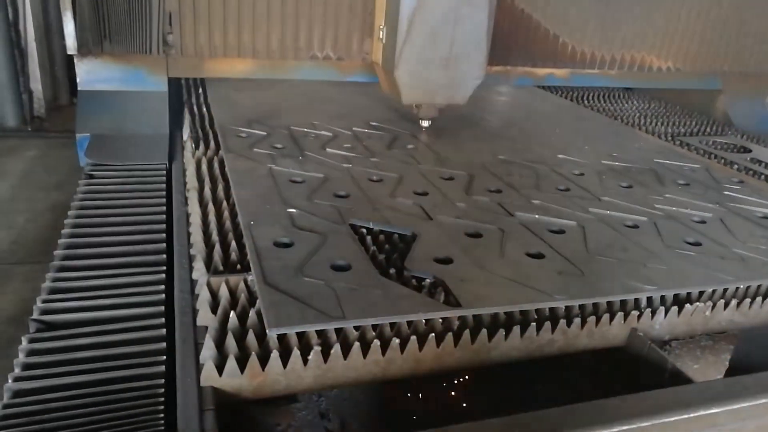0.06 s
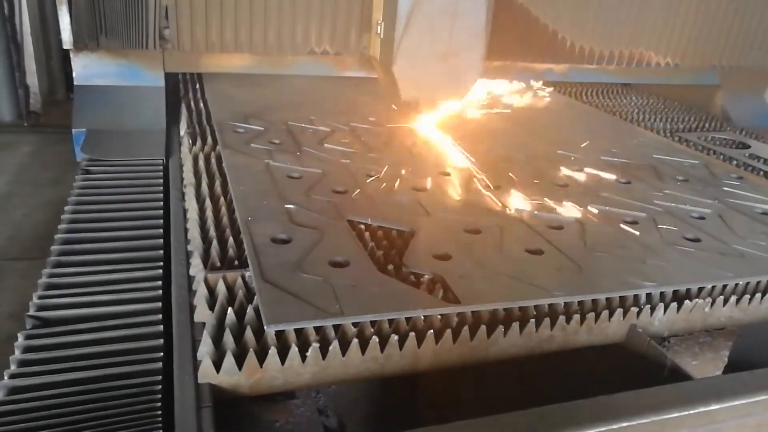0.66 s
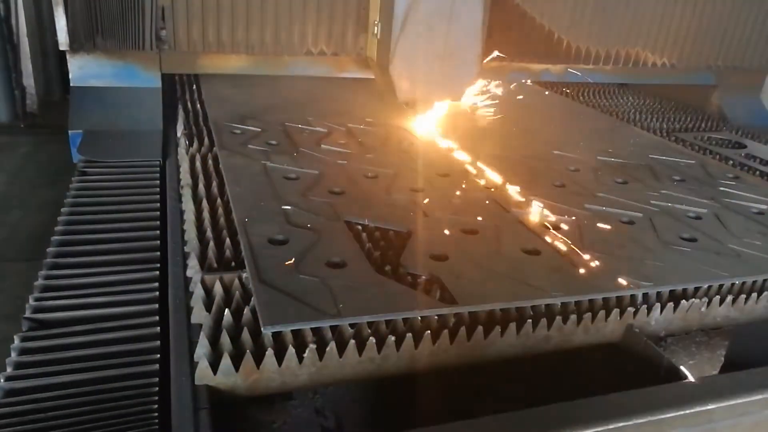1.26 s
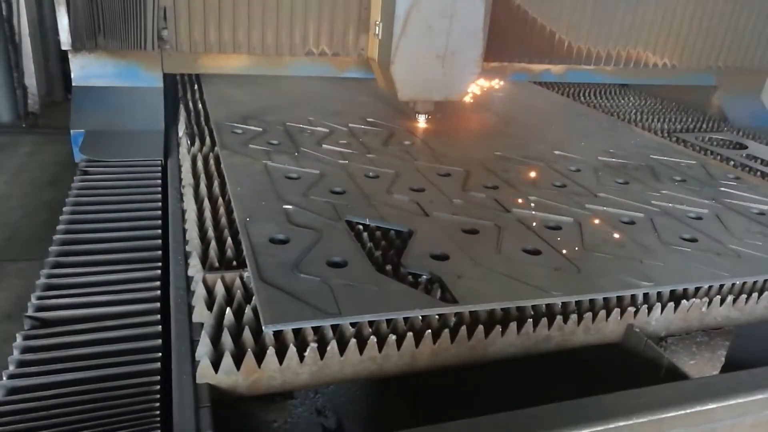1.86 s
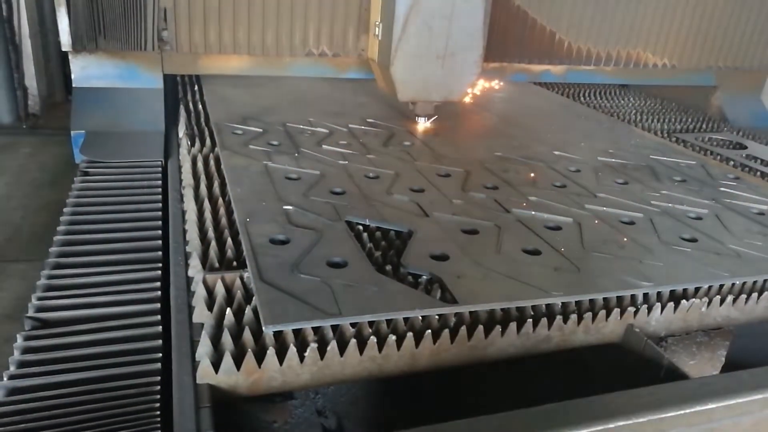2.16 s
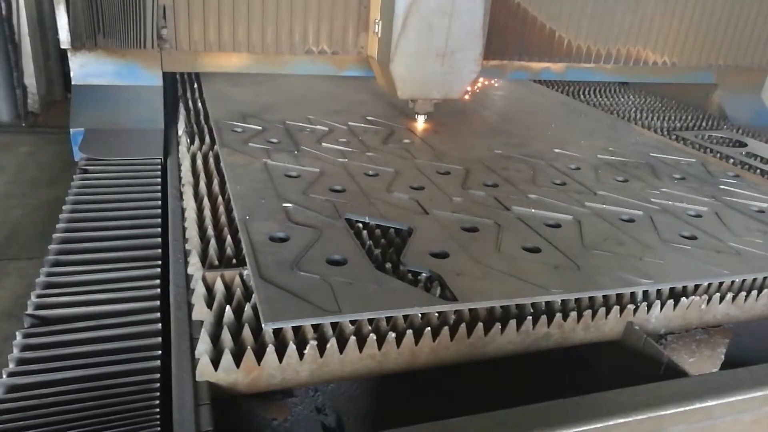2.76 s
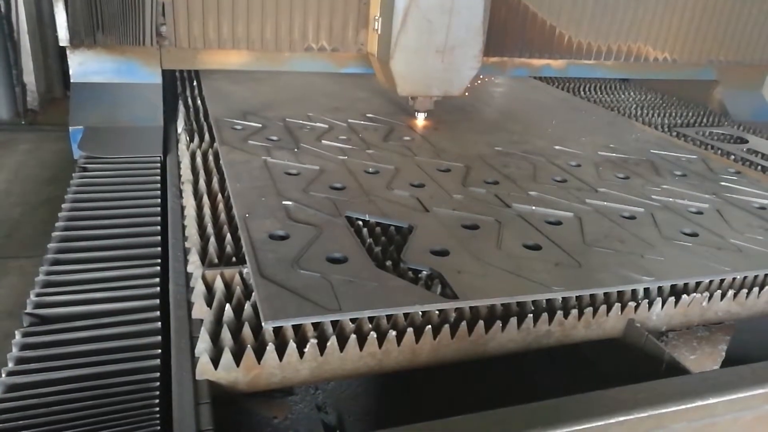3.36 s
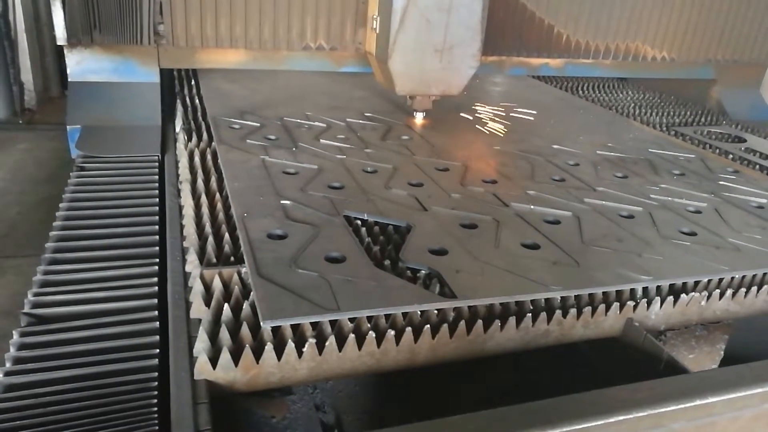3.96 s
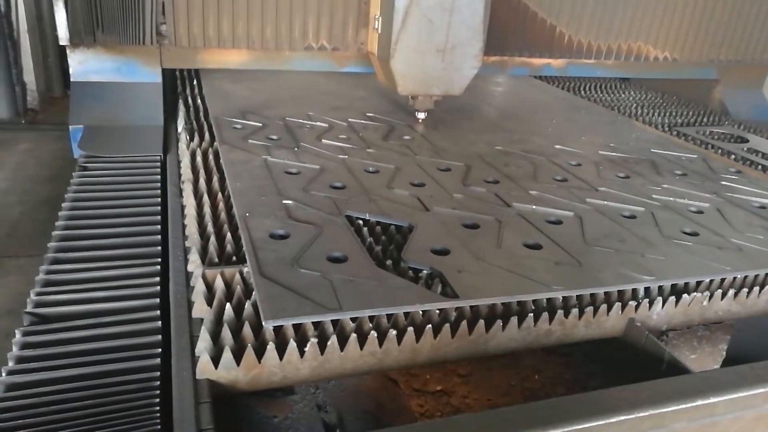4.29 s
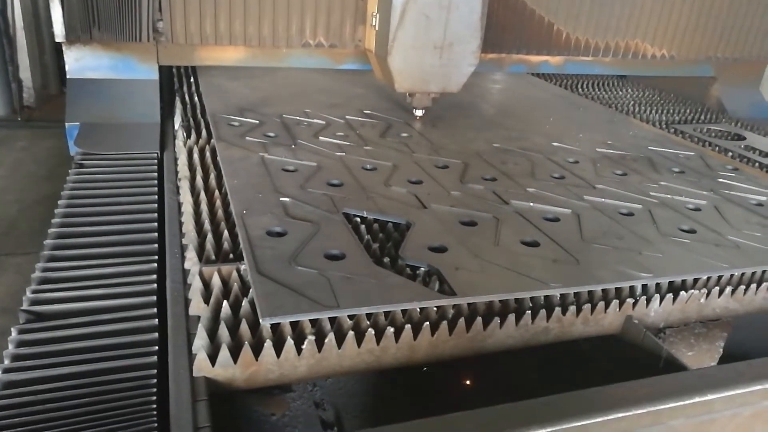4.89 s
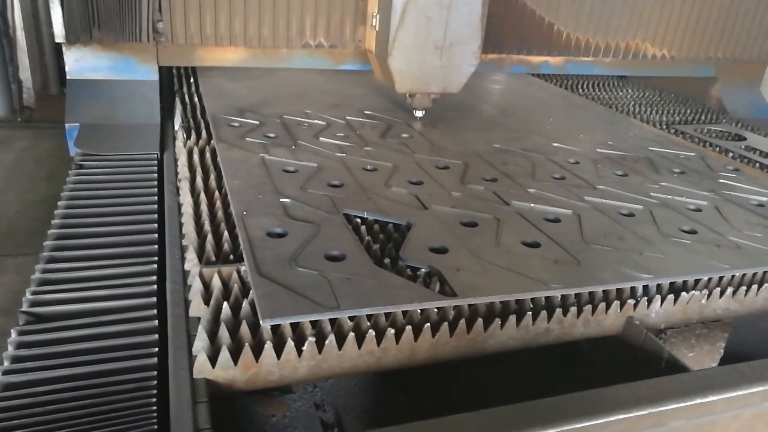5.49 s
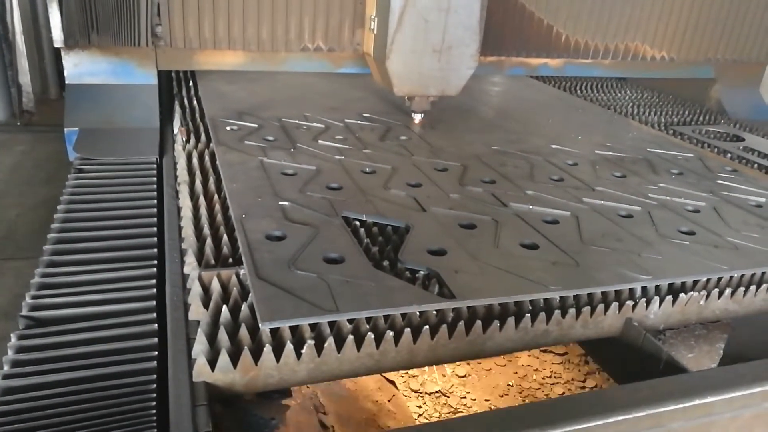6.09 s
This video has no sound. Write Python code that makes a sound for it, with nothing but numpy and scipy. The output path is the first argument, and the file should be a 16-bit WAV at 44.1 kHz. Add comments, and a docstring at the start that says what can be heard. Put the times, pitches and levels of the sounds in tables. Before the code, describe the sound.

Loud high hiss of a laser piercing steel plate turns to a crackling buzz, then falls away, with a workshop fan rumbling underneath.

```python
"""Laser piercing steel plate

Over the hum of a workshop's extractor fan, a valve spits and a gas jet builds to a loud hiss.
The laser beam then pulses 200 times a second: the hiss buzzes, the hole sings and beads of melt pop.
When the beam breaks through, the gas escapes under the plate and the jet falls to a faint hiss."""
import sys
import numpy as np
from scipy import signal
from scipy.fft import rfft, irfft, next_fast_len
from scipy.io import wavfile

SR = 44100
rng = np.random.default_rng(int(sys.argv[2]) if len(sys.argv) > 2 else 0)


def bounce(signal):
    """Save signal as a 16-bit WAV file at the path given by the first command-line argument."""
    frames = np.transpose(np.atleast_2d(signal))
    limited = np.clip(frames, -1, 1)
    pcm = np.round(limited * 32767).astype(np.int16)
    wavfile.write(sys.argv[1], SR, pcm)


N = 270489

# how loud the background rumble sounds; it sinks as the recorder turns it down: time_s, level_db
RUMBLE_LEVELS = [(0, -47), (.85, -54.5), (1.72, -55), (1.92, -56), (3.0, -61), (3.42, -65), (5.3, -62),
                 (6.13, -62)]
# tone colour of the rumble: pitch_hz, gain_db
RUMBLE_COLOUR = [(20, -17), (48, 1.5), (70, -2), (110, -0.5), (170, -0.5), (300, 1), (480, -7.5),
                 (680, -6.5), (950, -2.5), (1500, -5.5), (3000, -12), (8000, -23.5), (16000, -30)]
# tones in the extractor fan's hum: pitch_hz, level_db
FAN_TONES = [(49, -69.5), (115, -60.3), (157, -70.5), (230.5, -73), (382, -72)]

# spits of the valve: start_s, level_db, hold_s, fade_s (time to fall 60 dB)
VALVE_SPITS = [(0.088, -33.5, 0.0091, 0.027), (0.096, -42, 0.023, 0.56), (6, -53, .003, .02)]
# tone colour of a spit: pitch_hz, left_db, right_db
SPIT_COLOUR = [(700, -39, -29), (1980, 0, -9), (4800, -15, -9), (5630, -3, 2), (7700, -1.5, -5),
               (9600, -2, -17), (12200, -11, -15), (16000, -26, -10)]

# gobs of slag blown out of the hole: start_s, peak_db, length_s
SLAG_GOBS = [(2.207, -45, .006), (2.972, -45, .0035)]
# tones of the hole and the gap under the nozzle, all multiples of the pulse rate: pitch_hz, gain_db
HOLE_TONES = [(800, -15), (1200, -14), (1400, -18), (1600, 0), (1800, -8), (2000, -12), (2800, -10),
              (4000, -14), (4600, -14)]
# the largest beads of melt bursting: start_s, level_db
BIG_POPS = [(2.163, -13), (2.2095, -13), (2.2134, -12), (2.2734, -15), (2.2945, -12), (2.3095, -14),
            (2.3434, -12), (2.6895, -16), (2.7095, -15.5), (2.7744, -15), (2.8944, -14), (2.9395, -15),
            (2.9594, -9), (2.9742, -11), (2.9784, -14), (2.9836, -8), (2.9891, -12), (3.0595, -14),
            (3.0744, -11)]
# bouts in which melt boils out of the hole: start_s, end_s, pops_per_s
BOILING_BOUTS = [(2.195, 2.37, 125), (2.675, 2.87, 55), (2.87, 3.0, 110), (3.0, 3.18, 28)]

# tone colour of the rush at the nozzle: pitch_hz, left_db, right_db
RUSH_COLOUR = [(3800, -35, -35), (4900, -18.5, -20.5), (5500, -11, -13.5), (6500, -9, -13.5),
               (7400, -7.5, -12.5), (8100, -4, -19), (9000, -1.5, -16), (9700, -1, -15.5),
               (10500, -3, -13.5), (11200, -4, -14), (11700, -11, -16), (12500, -14, -17),
               (14000, -13, -20), (15000, -12.5, -20), (16000, -17, -21)]
# tone colour of the high sizzle from the hole: pitch_hz, left_db, right_db
SIZZLE_COLOUR = [(7000, -40, -40), (10300, -31, -20), (11800, -25, -17), (12600, -24, -11),
                 (13400, -19, -7.5), (13950, -17, -2), (14700, -13, 0), (15300, -12, -1), (16000, -16, -3)]
# tone colour of the lower roar on the plate: pitch_hz, left_db, right_db
ROAR_COLOUR = [(300, -30, -30), (650, -12.5, -13), (1200, -6.5, -7.5), (1900, 0, -2), (2300, -2, -2),
               (2750, 2, -1), (3200, -3, -2), (3700, -3, 0), (4300, 0, 2), (5000, -2, -3), (8000, -20, -20)]
# narrow bands where the nozzle rings: pitch_hz, width_hz, gain_db
NOZZLE_RINGS = [(8750, 260, 1.5), (9450, 260, 3), (10030, 280, 3.5), (10950, 330, 4.5), (11600, 400, -2.5),
                (11900, 250, 3), (12450, 300, -2), (13750, 330, 4)]
# the gap between nozzle and plate rings in the rush: pitch_hz, width_hz, gain_db
GAP_RING = [(9700, 1700, 2.5)]
# the space between laser head and plate rings in the roar: pitch_hz, width_hz, gain_db
HEAD_RING = [(2620, 78, 3.5)]
# how far the jet's sound lags at the left ear: pitch_hz, lag_radians
LEFT_EAR_LAG = [(20, 0), (2000, 0), (2900, 3), (3600, 5), (4000, 7.9), (4700, 9), (5400, 11.1),
                (6200, 11.4), (7200, 12.6), (7900, 12.2), (9000, 14), (10400, 15.6), (11700, 16.6),
                (12800, 18.6), (14000, 20.9), (14900, 20.5), (16000, 21.8)]
# the jet on the deepening hole, at full pressure: time_s, rush_db, sizzle_db, roar_db
PIERCING_LEVELS = [(.7, -29, -38, -44.5), (1.16, -32, -31.5, -43), (1.21, -34.5, -32, -48.5),
                   (1.68, -34.5, -28, -49), (1.96, -37.5, -30.5, -53), (2.02, -40, -36, -52),
                   (2.3, -40, -37, -47), (2.55, -40.5, -38.5, -51.5), (2.95, -39, -34, -46.5),
                   (3.35, -39, -42.5, -51), (3.7, -38, -44.5, -50.5), (4.05, -37.5, -44, -50)]
# the jet through the open hole: time_s, rush_db, sizzle_db, roar_db
OPEN_HOLE_LEVELS = [(4.2, -55, -58, -60.5), (4.43, -53, -51, -62.5), (5.11, -55.5, -59.5, -62.5),
                    (5.45, -52, -64, -61), (5.75, -55, -56.5, -66.5), (6.13, -59, -60, -66)]
# brief surges and one sag of the jet: time_s, rise_s, fall_s, rush_db, sizzle_db, roar_db
JET_SURGES = [(.21, .08, 0.083, 2, 16, 13.5), (2.2, 0.042, 0.022, 5, 2, 5.5),
              (3.85, .03, .03, -2, -6, -2.5), (5.62, .09, 0.044, 7.5, 11, 6)]
# each sound of the jet grows as a power of the gas pressure: rush_power, sizzle_power, roar_power
PRESSURE_POWERS = [4.05, 4.3, 3.5]

VALVE_OPENS_S, PRESSURE_RISE_S = .11, .19
PULSE_HZ, PULSE_PHASE = 200, .88
PULSING_STARTS_S, PULSING_WEAKENS_S = 2.125, 3.79
BREAKTHROUGH_S, ESCAPE_S = 4.07, .05
CUTOFF_HZ = 15900


def from_db(db):
    """Turns decibels into a factor to multiply by."""
    return 10 ** (np.asarray(db) / 20)


def rms_one(x):
    """Scales a sound so that the average of its channels has a strength (rms) of 1."""
    return x / np.sqrt(np.mean(np.atleast_2d(x).mean(axis=0) ** 2) + 1e-20)


def seconds():
    """The time of every sample."""
    return np.arange(N) / SR


def in_time(rows):
    """One curve per level column, joining the rows with straight lines."""
    times, *columns = np.transpose(rows)
    return [np.interp(seconds(), times, column) for column in columns]


def ramp(start_s, length_s):
    """Rises from 0 to 1 in a straight line."""
    return np.clip((seconds() - start_s) / length_s, 0, 1)


def settling(start_s, time_constant_s):
    """Rises from 0 to 1, quickly at first, then ever more slowly."""
    return 1 - np.exp(-np.maximum(seconds() - start_s, 0) / time_constant_s)


def drift(rate_hz):
    """A smooth random wobble with a typical size of 1."""
    step = 40  # samples between random points
    memory = np.exp(-2 * np.pi * step * rate_hz / SR)
    noise = rng.standard_normal(N // step + 2002)
    slow = signal.lfilter([1], [1, -2 * memory, memory * memory], noise)[2000:]
    return np.interp(np.arange(N) / step, np.arange(len(slow)), rms_one(slow))


def stereo_noise(alike):
    """White noise; alike (0-1) is the share that both ears have in common."""
    return np.sqrt(alike) * rng.standard_normal(N) + np.sqrt(1 - alike) * rng.standard_normal((2, N))


def passed(x, hz, kind, order=2):
    """Lets through the lows, the highs or one band."""
    return signal.sosfilt(signal.butter(order, hz, kind, fs=SR, output="sos"), x + 1e-18)


def coloured(x, colour, rings=(), lag=((20, 0), (20000, 0))):
    """Gives a sound a tone colour and ringing bands; the left ear may hear it late."""
    size = next_fast_len(N)
    hz = np.arange(size // 2 + 1) * SR / size
    points, *columns = np.transpose(colour)
    gain_db = np.array([np.interp(np.log(hz + 1), np.log(points), column) for column in columns])
    gain_db += sum(db / (1 + (2 * (hz - centre) / width) ** 2) for centre, width, db in rings)
    left_delay = np.exp(-1j * np.interp(hz, *np.transpose(lag)) * np.array([[1], [0]]))
    return irfft(rfft(x, size) * from_db(gain_db) * left_delay, size)[:, :N]


def reflected(x, echo_db=-20, count=6):
    """Weak, quick echoes off the machine's frame and bed, different for each ear."""
    delays = (rng.uniform(.001, .012, (2, count)) * SR).astype(int)
    echoes = [sum(np.roll(ear, delay) for delay in row) for ear, row in zip(x, delays)]
    return x + from_db(echo_db) * np.array(echoes)


def extractor_fan():
    """The fan fills the workshop with rumble and hum, its bass alike in both ears."""
    level_db, = in_time(RUMBLE_LEVELS)
    air = passed(stereo_noise(.93), 280, "low") + passed(stereo_noise(.25), 280, "high")
    rumble = from_db(level_db + 1.5 + 1.5 * drift(8.3)) * rms_one(coloured(air, RUMBLE_COLOUR))
    hum = sum(from_db(db + 1.3 * drift(5)) * np.sin(2 * np.pi * hz * seconds() + .45 * drift(3))
              for hz, db in FAN_TONES)
    # the hum is turned down with the rumble, but less steeply
    return rumble + np.sqrt(2) * hum * from_db(.84 * (level_db + 58))


def valve_spits(attack_s=.003):
    """The valve lets go short bursts of gas."""
    level = np.zeros(N)
    for start_s, db, hold_s, fade_s in VALVE_SPITS:
        fallen_db = 60 * np.maximum(seconds() - start_s - hold_s, 0) / fade_s
        level += ramp(start_s, attack_s) * from_db(db - fallen_db)
    return level * rms_one(coloured(stereo_noise(.14), SPIT_COLOUR))


def beam_phase():
    """Place in the beam's pulse cycle, 0-1, counted from the peak of a pulse."""
    return (seconds() * PULSE_HZ - PULSE_PHASE) % 1


def pulsing(switch_s=.04, weak_depth=.38):
    """How strongly the beam pulses, 0-1: fully at first, then weakly until it is through."""
    strength = 1 - (1 - weak_depth) * ramp(PULSING_WEAKENS_S, switch_s)
    return ramp(PULSING_STARTS_S, switch_s) * strength * (1 - settling(BREAKTHROUGH_S, ESCAPE_S))


def throb(depth, boil_db, flare_db, boil_share=.75, flare_width=.058):
    """A pulsing gain: metal boils while the beam is on and flares just before it goes off."""
    phase = (beam_phase() + .5) % 1 - .5
    boiling = np.exp(-((phase + boil_share / 2 - flare_width) / (boil_share / 2 + flare_width)) ** 4)
    flare = np.exp(-(phase / flare_width) ** 2)
    power = from_db(boil_db * boiling + flare_db * flare) ** 2
    return np.sqrt(1 + depth * (power / power.mean() - 1))


def metal_vapour(band_hz=(4280, 9000), fall_db_per_s=2):
    """Each pulse puffs vapour out of the hole: a throbbing fizz that fades as the hole deepens."""
    depth = pulsing()
    fizz = rms_one(passed(stereo_noise(.48), band_hz, "band", order=3))
    left_right_db = np.array([[-52], [-43.5]]) - fall_db_per_s * (seconds() - PULSING_STARTS_S)
    return depth * from_db(left_right_db) * fizz * throb(depth, boil_db=10, flare_db=3)


def slag_gobs():
    """Each gob of slag gives a soft, low push of air."""
    out = np.zeros(N)
    for start_s, peak_db, length_s in SLAG_GOBS:
        age = np.maximum(seconds() - start_s, 0) / length_s
        push = age * (1 - age / 2) * np.exp(-age)
        out += from_db(peak_db) * push / push.max()
    return out


def singing_hole(level_db=-58.5):
    """The beam's pulses make the hole ring with a thin, rough note, louder on the left."""
    note = sum(from_db(db + 2.3 * drift(18)) * np.sin(2 * np.pi * hz * seconds() + .3 * drift(40))
               for hz, db in HOLE_TONES)
    return np.sqrt(2) * note * pulsing() ** 2 * from_db(level_db + np.array([[2.5], [-2.5]]))


def melt_clicks(edge_s=.035, jitter_s=.00022, fall_db_per_s=4, small_pop_db=-19.3):
    """Every pulse throws fine spatter; in a bout melt gathers into beads, which the pulses burst."""
    pulses = np.flatnonzero(np.diff(beam_phase()) < 0)
    pulse_s = pulses / SR
    pops_per_s = sum(rate * (ramp(start - edge_s / 2, edge_s) - ramp(end - edge_s / 2, edge_s))
                     for start, end, rate in BOILING_BOUTS)[pulses]
    scatter, size, feed, lateness = np.clip(rng.standard_normal((len(pulses), 4)), -2, 2).T
    # spatter fades as the hole deepens and swells in a bout
    boiling = np.sqrt(np.abs(pops_per_s) / pops_per_s.max())
    spatter_db = -42 - fall_db_per_s * (pulse_s - PULSING_STARTS_S) + 5 * boiling + 3 * scatter
    clicks = np.zeros(N)
    clicks[pulses] = pulsing()[pulses] * from_db(spatter_db)
    beads_so_far = np.round(np.cumsum(pops_per_s / PULSE_HZ * (1 + feed / 2)))
    big_s, big_db = np.transpose(BIG_POPS)
    # a large bead takes all the melt of its pulse
    free = np.abs(pulse_s[:, None] - big_s).min(axis=1) > .5 / PULSE_HZ
    ready = free & (np.diff(beads_so_far, prepend=0) > 0)
    small_pops = (pulses + lateness * jitter_s * SR)[ready].astype(int)
    clicks[small_pops] += from_db(small_pop_db + 1.5 * size[ready])
    clicks[np.round(big_s * SR).astype(int)] += from_db(big_db)
    return clicks


def melt_pops(knock_hz=(720, 1150), top_hz=5000, recoil_hz=500, left_delay_s=.00055):
    """Each bursting bead makes a sharp pressure spike with a shallow recoil and a hollow knock."""
    clicks = melt_clicks()
    knock = from_db(-5) * passed(clicks, knock_hz, "band", order=1)
    click_peak = passed(signal.unit_impulse(SR // 100), top_hz, "low", order=3).max()
    spikes = passed(clicks + knock, top_hz, "low", order=3) / click_peak
    right = passed(spikes, recoil_hz, "high", order=1)
    # the left ear hears them duller, weaker and later
    dull = passed(right, 1400, "low", order=1)
    left = from_db(-7.5) * np.interp(seconds() - left_delay_s, seconds(), dull)
    # the bed under the plate booms briefly, and bursts in a row add up to a low buzz
    t = seconds()[:SR // 10]
    boom = np.cos(2 * np.pi * PULSE_HZ * t) * from_db(-37.5 - 60 * t / .042)
    return np.array([left, right]) + signal.fftconvolve(clicks, boom)[:N]


def repeating_hiss():
    """A scrap of hiss that comes back the same with every beam pulse."""
    harmonics = np.exp(2j * np.pi * rng.random(CUTOFF_HZ // PULSE_HZ))
    cycle = irfft(np.append(0, harmonics), 2 ** 12)
    return rms_one(np.interp(beam_phase(), np.arange(len(cycle)) / len(cycle), cycle))


def turbulence(depth, alike, flutter_db, grain_db, repeat_share=.165):
    """Fluttering gas noise; while the beam pulses, a share of it repeats exactly."""
    share = repeat_share * depth
    noise = np.sqrt(1 - share) * stereo_noise(alike) + np.sqrt(share) * repeating_hiss()
    grain = np.clip(drift(400), -1.5, 1.5)
    return noise * from_db(flutter_db * drift(19) + grain_db * grain)


def jet_levels():
    """Rush, sizzle and roar in dB: they build with the pressure, surge and drop at the breakthrough."""
    t = seconds()
    through = settling(BREAKTHROUGH_S, ESCAPE_S)
    levels_db = (1 - through) * in_time(PIERCING_LEVELS) + through * in_time(OPEN_HOLE_LEVELS)
    for time_s, rise_s, fall_s, *gains_db in JET_SURGES:
        width_s = np.where(t < time_s, rise_s, fall_s)
        levels_db += np.outer(gains_db, np.exp(-((t - time_s) / width_s) ** 2))
    pressure_db = 20 * np.log10(settling(VALVE_OPENS_S, PRESSURE_RISE_S) + 1e-9)
    return levels_db + np.outer(PRESSURE_POWERS, pressure_db)


def gas_jet(gap_onset_db=3, gap_range_db=6):
    """Gas rushes from the nozzle, sizzles in the hole and roars along the plate."""
    rush_db, sizzle_db, roar_db = jet_levels()
    depth = pulsing()
    rush = turbulence(depth, alike=.72, flutter_db=.45, grain_db=1)
    rush *= throb(depth, boil_db=8.4, flare_db=.6)
    sizzle = turbulence(depth, alike=1, flutter_db=0, grain_db=.9)
    sizzle *= throb(depth, boil_db=10, flare_db=6)
    roar = turbulence(depth, alike=.16, flutter_db=1, grain_db=.3, repeat_share=.075)
    roar *= throb(depth, boil_db=2, flare_db=5)
    rush = rms_one(coloured(reflected(rush), RUSH_COLOUR, NOZZLE_RINGS, LEFT_EAR_LAG))
    sizzle = rms_one(coloured(reflected(sizzle), SIZZLE_COLOUR, lag=LEFT_EAR_LAG))
    roar = rms_one(coloured(reflected(roar), ROAR_COLOUR, HEAD_RING, LEFT_EAR_LAG))
    # the gap under the nozzle rings more as the rush outweighs the sizzle
    ringing = np.clip((rush_db - sizzle_db - gap_onset_db) / gap_range_db, 0, 1)
    rush = (1 - ringing) * rush + ringing * rms_one(coloured(rush, [(20, 0)], GAP_RING))
    return from_db(rush_db + .2) * rush + from_db(sizzle_db + 3) * sizzle + from_db(roar_db - .47) * roar


def scene():
    """Jet, hole, melt, valve and fan together."""
    piercing = gas_jet() + singing_hole() + melt_pops() + slag_gobs() + metal_vapour()
    return piercing + valve_spits() + extractor_fan()


def record(dry):
    """Cuts off the very highest treble steeply."""
    return signal.sosfilt(signal.ellip(12, .1, 80, CUTOFF_HZ, fs=SR, output="sos"), dry)


dry = scene()
out = record(dry)
bounce(out)
```